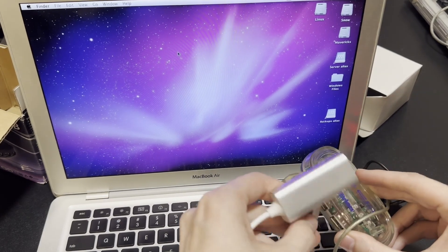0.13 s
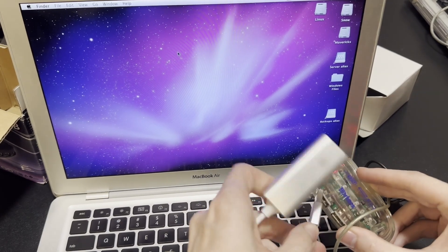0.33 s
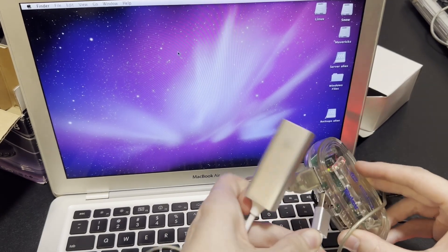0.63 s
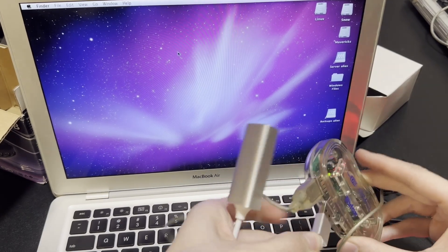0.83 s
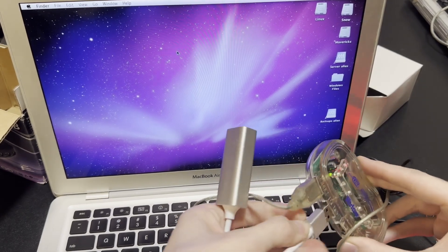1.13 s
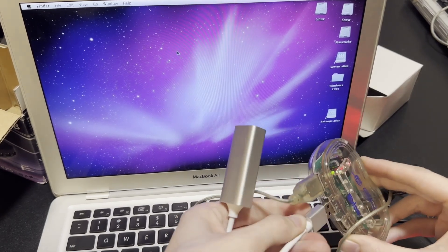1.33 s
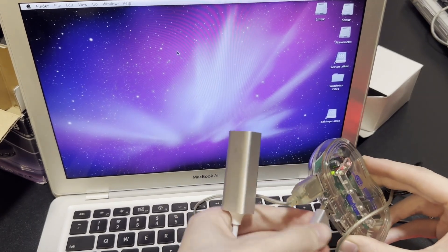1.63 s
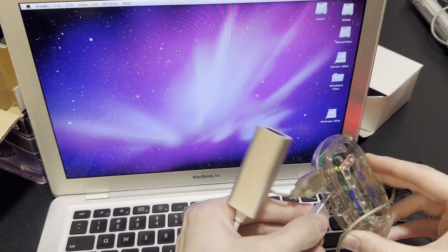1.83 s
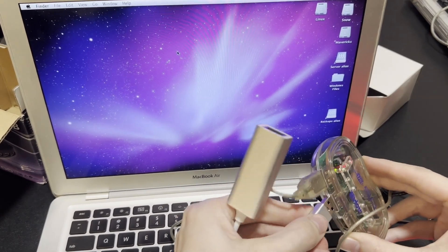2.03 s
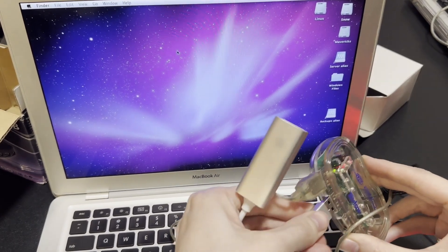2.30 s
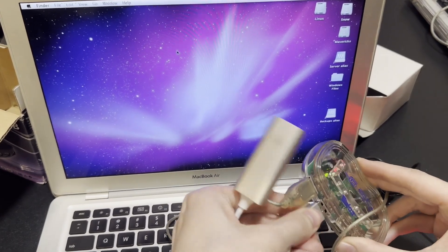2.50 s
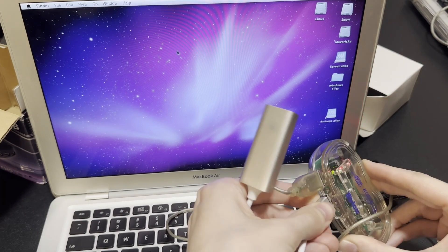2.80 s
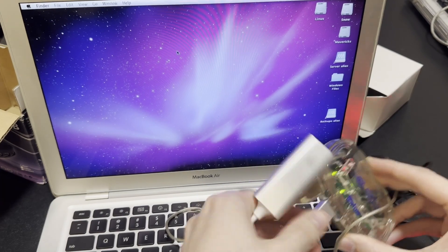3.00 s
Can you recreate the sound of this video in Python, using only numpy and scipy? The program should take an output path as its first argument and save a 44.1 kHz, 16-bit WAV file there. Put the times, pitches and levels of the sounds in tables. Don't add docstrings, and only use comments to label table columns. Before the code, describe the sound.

Plastic and metal clicking at a desk: a bright opening double tap, then short rattling knocks about every half second, with faint finger rubbing between, close-miked over low fan rumble and light room echo.

```python
import sys
import numpy as np
from scipy import signal
from scipy.fft import rfft, irfft
from scipy.io import wavfile
from scipy.ndimage import uniform_filter1d

SR = 44100
rng = np.random.default_rng(int(sys.argv[2]) if len(sys.argv) > 2 else 0)


def how_loud(loudness_db):
    steps = np.asarray(loudness_db, float) / 20
    return 10 ** steps


def to_wav(s):
    ch = np.atleast_2d(s).T
    pcm = np.round(np.clip(ch, -1, 1) * 32767)
    wavfile.write(sys.argv[1], SR, pcm.astype(np.int16))


N = 138915

# [t/s, top level/dB, then upper, middle, low level/dB relative to top]
TAPS = [
    (.0326, -8.5, -11, -18, -43),
    (.0345, -24.5, -2, -13.5, -33),
    (.0525, -15, -10.5, -16, -19.5),
]
KNOCKS = [(.0848, -25.5, -8, -6, -43), (.9545, -31, -19, -12, -24), (.9572, -26, -13, -15, -14),
          (.9602, -21.5, -18, -12, -25), (.9652, -24.5, -6, -10, -2.5), (.9685, -35, 6.5, -12, 4.5),
          (.9715, -37, -9, -0.5, 6.5), (1.455, -37.5, -3, -2, 7.5), (1.897, -21, -15, -8.5, -11),
          (1.9005, -37, -3, -4.5, 0), (2.0835, -23.5, -14, -10, -0.5), (2.0865, -35.5, -1, -10, -3),
          (2.0895, -35.5, 2.5, -20, -2), (2.0925, -51.5, -20, 1, 3), (2.6055, -32, -12, -2, -0.5),
          (2.6092, -38.5, -1.5, 2.5, 10), (2.6148, -36.5, -10, -27, -18)]
TICKS = [(0.1414, -50, -5, 3.5, 4.5), (0.231, -52, -9, 4, 7.5), (0.3605, -53, -12, 5, 9.5),
         (0.6549, -41, -12.5, -13, -4.5), (0.782, -56.5, 1, -6, -18), (0.8825, -50.5, -1.5, -20.5, -2),
         (1.1087, -53.5, -7.5, -17, -8), (1.3114, -74.5, 13, -8.5, -4), (1.3377, -72.5, 15.5, 6, 16.5),
         (1.3484, -67, 12, 2, 8), (1.4102, -58.5, -6.5, -0.5, 9), (1.6934, -57, -25, -0.5, 8.5),
         (2.2683, -48, -6.5, -21.5, -19.5), (2.4512, -47, -42.5, -32, -31), (2.5044, -53, -9, -10.5, -1),
         (2.824, -66, -11, -20, -20), (3.0544, -53.5, -4.5, -27, -3)]
# [low f/Hz, high f/Hz]
GROUP_DB = [-1, 5, 8, 2]
GROUP_HZ = [(8000, 16000), (2700, 8000), (1500, 2700), (400, 1500)]
# [f/Hz, level/dB]
SLEEVE_MODES = [(600, -10), (850, 4.5), (1150, 9), (1800, -14.5), (2600, -7.5), (3000, -25)]
SHELL_MODES = [(480, -5.5), (700, -7), (1000, 5), (1230, 6.5), (1720, -1), (1930, -2), (2350, -7),
               (2850, 0.5), (3400, -5.5)]
PLUG_MODES = [(3950, -5), (5030, -0.5), (6000, -9.5), (7150, -2), (8300, -8), (9200, 2.5), (10200, 4.5),
              (11000, -7), (11700, -5.5), (13000, -8.5), (14000, -6.5), (15000, -6)]
SHELL_T60_S, PLUG_T60_S = 0.009, 0.004
TAP_RISE_S, KNOCK_RISE_S, TICK_RISE_S = 0.0002, 0.00083, 0.00045
RATTLE_S, TICK_S = 0.0011, 0.0013
HIT_SCATTER_DB, DETUNE = 1.5, 0.014

# [t/s, f/Hz, level/dB, t60/s]
RINGS = [(0.031, 5090, -45, 0.36), (0.042, 6800, -51, 0.29), (.056, 18000, -46.5, 0.27),
         (.086, 2020, -44, .12), (.968, 4900, -56, 0.32), (.975, 2780, -58, .25), (2.607, 300, -46, 0.032),
         (1.4545, 1810, -28, 0.018), (2.09, 4850, -55.5, 0.41), (2.4, 141.4, -44, 0.075),
         (.0365, 10300, -52, .2), (1.8965, 2800, -28, 0.018), (1.8965, 3900, -27.5, 0.014),
         (.96, 2760, -24.5, 0.022), (1.899, 1910, -51.5, 0.27), (1.458, 1820, -57, 0.28),
         (2.612, 1800, -58, 0.31),
         (.4333, 2780, -62, 0.013), (.557, 2030, -53.5, 0.013), (0.6955, 1153, -53, 0.018),
        (0.7424, 1790, -54.5, .015), (.767, 2000, -56.5, 0.018), (.7835, 3500, -54.5, 0.016),
        (.918, 10100, -58, .008), (1.0861, 1800, -51, 0.017), (1.1929, 1940, -54.5, 0.019),
        (1.3121, 6030, -51, 0.0088), (1.3376, 5300, -41, 0.0059), (1.356, 5700, -47.5, 0.0091),
        (1.4242, 1930, -45.5, 0.017), (1.6782, 2390, -55, 0.0083), (1.7709, 2000, -56.5, 0.012),
        (1.886, 1900, -59, .03), (1.955, 2200, -48, 0.014), (1.955, 900, -49.5, 0.016),
        (2.013, 10300, -58, 0.0094), (2.4823, 1110, -60, 0.017), (2.508, 2480, -56, 0.015),
        (2.51, 5000, -61, 0.02), (2.527, 1060, -52, .015), (2.546, 7540, -53, 0.014),
        (2.547, 4960, -56, 0.015), (2.5585, 1840, -44.5, 0.015), (2.56, 2740, -51, 0.012),
        (2.57, 1880, -51, 0.014), (2.589, 1880, -50, 0.015), (2.824, 4800, -59, .012)]
RING_SPREAD, RING_SPREAD_TOP_HZ = 0.022, 90

# [middle t/s, length/s, bright level/dB, dull level/dB]
RUBS = [(0.194, 0.086, -64.5, -63), (0.345, 0.079, -67, -66), (0.538, 0.056, -81, -68.5),
        (0.644, 0.057, -70.5, -61), (0.778, 0.08, -65, -64.5), (0.913, 0.11, -60.5, -64),
        (1.43, 0.018, -87, -63), (1.792, 0.037, -75, -65), (1.904, 0.16, -73, -75),
        (2.358, 0.066, -75, -74.5), (2.56, 0.1, -69, -64.5), (2.733, 0.056, -86.5, -79),
        (2.985, 0.1, -77, -70), (3.084, 0.098, -69.5, -68.5)]
# [middle t/s, length/s, f/Hz, level/dB]
SCRAPES = [(0.552, 0.026, 2630, -69.5), (0.633, 0.027, 2580, -61.5), (0.673, 0.047, 1210, -72),
           (.84, 0.12, 10300, -77), (0.33, 0.056, 10270, -63), (0.34, 0.08, 13700, -71),
           (1.355, .012, 4930, -66.5), (1.86, 0.1, 9360, -72.5), (2.352, 0.048, 1200, -73),
           (2.563, .025, 5200, -72.5), (2.57, 0.021, 2300, -66), (2.74, 0.052, 1300, -67),
           (3.058, 0.11, 1270, -68.5)]
# [f/Hz, level/dB per Hz]
FINGERTIP_COLOUR = [(5000, -5), (7500, -6.5), (9800, 0), (10800, -1.5), (12200, -9.5), (14200, -4),
                    (15500, -8)]
PALM_COLOUR = [(400, -2), (800, -4), (1150, 3.5), (1500, -2.5), (1900, -2.5), (2750, -7.5), (3400, -12),
               (5500, -21)]
RUB_EDGE_S, SCRAPE_EDGE_S, SCRAPE_WIDTH_HZ = 0.02, 0.004, 600

# [f/Hz, level/dB per Hz]
RUMBLE_COLOUR = [(30, -8.5), (54, 3.5), (95, 1), (125, -3), (180, -8.5), (240, -9.5), (600, -26.5),
                 (1000, -26)]
HISS_COLOUR = [(800, -8.5), (1300, 0), (2500, -8.5), (5300, -12), (6300, -1), (7800, 2), (8800, -31.5),
               (16000, -14)]
RUMBLE_DB, HISS_DB = -57.5, -74.5
WHINE_HZ, WHINE_DB, HUM_HZ, HUM_DB = 10040, -88, 99.1, -67

# [f/Hz, level/dB]
SIDE_HITS = [(200, -7.5), (1000, -12), (2000, -5), (4000, -7), (8000, 5.5), (10000, -4.5), (12000, -16),
             (16000, 1.5)]
SIDE_AIR = [(30, -20), (125, -15.5), (300, -8), (1000, 1), (4000, -0.5), (9000, -0.5), (11500, -10),
            (15000, -4)]
# [f/Hz, phase/rad]
SIDE_TURN = [(500, 1.3), (1000, 1.8), (2000, 2), (4000, 1), (8000, 1.5), (14000, 1.9)]
# [f/Hz, level/dB]
ROOM_T60 = [(300, 0.52), (1500, 0.41), (5000, 0.43), (15000, 0.14)]
ROOM_COLOUR = [(400, -5), (800, -2.5), (1250, 0.5), (1500, -1.5), (1900, -0.5), (3000, 0), (6000, 5),
               (15000, 2)]
ROOM_DB, MODAL_SEND = -18, 0.45
DESK_DIP_HZ, DESK_DIP_WIDTH_HZ = 1463, 620


def on(table, hz):
    points = np.array(table, float)
    return np.interp(np.log(hz + 1e-9), np.log(points[:, 0]), points[:, 1])


def level(x, db):
    return x * how_loud(db) / np.sqrt(np.mean(x ** 2))


def shape(x, table, turn=None):
    hz = np.fft.rfftfreq(len(x), 1 / SR)
    below = (table[0][0] / 2, table[0][1] - 30)
    above = (table[-1][0] * 2, table[-1][1] - 30)
    gain = how_loud(on([below, *table, above], hz))
    phase = 0 if turn is None else on(turn, hz)
    return irfft(rfft(x) * gain * np.exp(1j * phase), len(x))


def walk(rate):
    hold = int(SR / rate)
    steps = np.repeat(rng.standard_normal(N // hold + 1), hold)
    return 1.6 * uniform_filter1d(uniform_filter1d(steps, hold), hold)[:N]


def ports(mid, side):
    return np.array([mid + side, mid - side])


def decay(t, t60):
    return np.exp(-np.log(1000) * t / t60)


def steady_air():
    rumble = shape(rng.standard_normal(N), RUMBLE_COLOUR) * how_loud(1.3 * walk(7))
    hiss = shape(rng.standard_normal(N), HISS_COLOUR)
    whine = signal.lfilter(*signal.iirpeak(WHINE_HZ, 70.0, fs=SR), rng.standard_normal(N))
    return level(rumble, RUMBLE_DB) + level(hiss, HISS_DB) + level(whine, WHINE_DB)


def ventilation():
    cycles = np.cumsum(HUM_HZ + 2.3 * walk(19)) / SR
    hum = np.sin(2 * np.pi * cycles) * how_loud(1.4 * walk(2.3))
    return ports(steady_air() + level(hum, HUM_DB), shape(steady_air(), SIDE_AIR))


def rings():
    out, t = np.zeros(N + SR), np.arange(SR // 2) / SR
    for start_s, hz, db, t60 in RINGS:
        offset, phase = rng.standard_normal((2, 9, 1))
        mode_hz = hz + min(RING_SPREAD * hz, RING_SPREAD_TOP_HZ) * offset
        cluster = np.sin(2 * np.pi * (mode_hz * t + phase)).sum(axis=0) / 2
        onset = np.clip(t / 0.0018, 0, 1)
        i = int(start_s * SR)
        out[i:i + len(t)] += how_loud(db) * cluster * decay(t, t60) * onset
    return out[:N]


def modes(table, t60, push, chance, size):
    hz, db = np.array(table, float).T[:, :, None]
    group = 3 - np.searchsorted([1500, 2700, 8000], hz[:, 0])
    t = np.arange(size) / SR
    detune, scatter, sign = chance[:, :len(table), None]
    ring = np.sin(2 * np.pi * hz * (1 + DETUNE * detune) * t) * decay(t, t60)
    ring = signal.fftconvolve(ring, push, axes=1)
    ring = ring / np.sqrt(np.sum(ring ** 2, axis=1, keepdims=True))
    ring = np.sign(sign) * how_loud(db + HIT_SCATTER_DB * scatter) * ring
    return (group == np.arange(4)[:, None]) @ ring


def contacts(rows, shell, rise_s, rattle_s):
    out, t = np.zeros((2, N + SR)), np.arange(500) / SR - 0.004
    burst = np.exp(np.where(t < 0, t / rise_s, -t / rattle_s))
    hz = np.fft.rfftfreq(1024, 1 / SR)
    edges = np.array(GROUP_HZ[::-1], float)
    centre_hz, width_hz = np.sqrt(edges.prod(axis=1)), edges[:, 1] - edges[:, 0]
    for hit_s, top_db, *rel_db in rows:
        chance = rng.standard_normal((2, 3, 14))
        grit = rng.standard_normal((2, len(t)))
        push = grit[:1] * how_loud(3 * grit[1]) * burst
        body = modes(shell, SHELL_T60_S, push, chance[0], size=1500)
        body = body + modes(PLUG_MODES, PLUG_T60_S, push, chance[1], size=1500)
        peak = how_loud(top_db + np.array([0, *rel_db]) + GROUP_DB)
        parts = (peak / np.abs(body).max(axis=1))[:, None] * body
        i = int((hit_s + t[0] + 0.0005) * SR)
        out[0, i:i + parts.shape[1]] += parts.sum(axis=0)
        per_hz_db = 10 * np.log10(np.sum(parts ** 2, axis=1)[::-1] * SR / 2 / width_hz)
        even = irfft(how_loud(on(np.c_[centre_hz, per_hz_db], hz)))
        out[1, i:i + len(even)] += np.roll(even, 200)
    low_cut = signal.butter(4, 380, "high", fs=SR, output="sos")
    return signal.sosfilt(low_cut, out[:, :N])


def room(x):
    t, tail = np.arange(SR // 2) / SR, 0
    for hz in 250 * 2.0 ** np.arange(7):
        limits = [hz / np.sqrt(2), min(hz * np.sqrt(2), 20000)]
        band = signal.butter(2, limits, "band", fs=SR, output="sos")
        noise = signal.sosfilt(band, rng.standard_normal((2, len(t))))
        tail = tail + noise * decay(t, on(ROOM_T60, hz))
    tail = tail * np.clip(t / 0.0035, 0, 1)
    tail = tail / np.sqrt(np.sum(tail[0] ** 2)) * how_loud(ROOM_DB)
    mid, side = [signal.fftconvolve(x, one)[:N] for one in tail]
    return ports(mid, shape(side, SIDE_AIR))


def strokes(mid_s, length_s, edge_s):
    outside_s = np.abs(np.arange(N) / SR - mid_s) - length_s / 2
    return 1 / (1 + np.exp(np.clip(outside_s / edge_s, -30, 30)))


def grain():
    return rng.standard_normal(N) * how_loud(2.5 * rng.exponential(size=N) + 2.8 * walk(90))


def fingers():
    mid_s, length_s, bright_db, dull_db = np.array(RUBS).T[:, :, None]
    stroke = strokes(mid_s, length_s, RUB_EDGE_S)
    rustle = level(shape(grain(), FINGERTIP_COLOUR), 0) * (how_loud(bright_db) * stroke).sum(axis=0)
    rub = level(shape(grain(), PALM_COLOUR), 0) * (how_loud(dull_db) * stroke).sum(axis=0)
    out = rustle + rub
    grit = grain()
    for mid_s, length_s, hz, db in SCRAPES:
        peak = signal.iirpeak(hz, hz / SCRAPE_WIDTH_HZ, fs=SR)
        scrape = signal.lfilter(*peak, signal.lfilter(*peak, grit))
        out = out + level(scrape, db) * strokes(mid_s, length_s, SCRAPE_EDGE_S)
    return out


def desk_echo(hits):
    notch = signal.iirnotch(DESK_DIP_HZ, DESK_DIP_HZ / DESK_DIP_WIDTH_HZ, fs=SR)
    return signal.lfilter(*notch, hits)


def scene():
    taps = contacts(TAPS, SLEEVE_MODES, TAP_RISE_S, RATTLE_S)
    knocks = contacts(KNOCKS, SHELL_MODES, KNOCK_RISE_S, RATTLE_S)
    ticks = contacts(TICKS, SHELL_MODES, TICK_RISE_S, TICK_S)
    hits, spread = taps + knocks + ticks
    rest = rings() + fingers()
    near = desk_echo(hits) + rest
    close = ports(near, shape(near, SIDE_HITS, SIDE_TURN))
    far = room(shape(spread, ROOM_COLOUR) + MODAL_SEND * hits + rest / 2)
    return close + far + ventilation()


def low_pass(x):
    return signal.sosfilt(signal.butter(12, 16810, fs=SR, output="sos"), x)


def record(dry):
    top_cut = signal.ellip(8, 0.2, 70, 15750, fs=SR, output="sos")
    mix = signal.sosfilt(top_cut, dry)
    return low_pass(mix)


dry = scene()
out = record(dry)
to_wav(out)
```